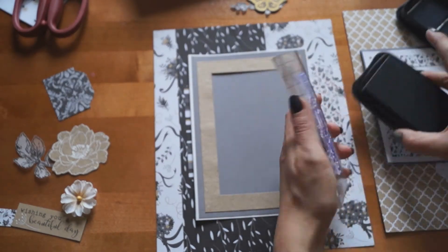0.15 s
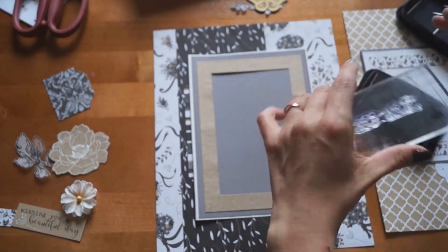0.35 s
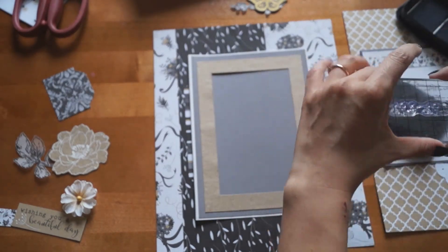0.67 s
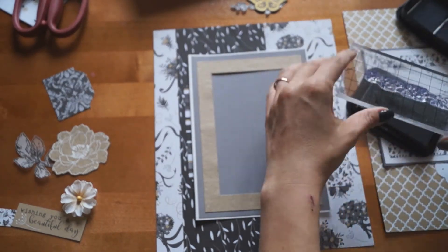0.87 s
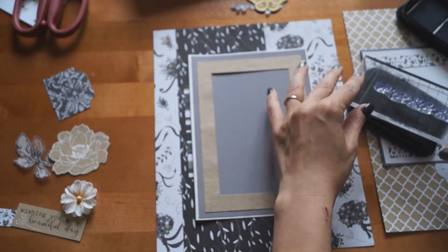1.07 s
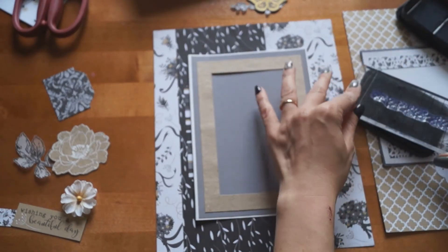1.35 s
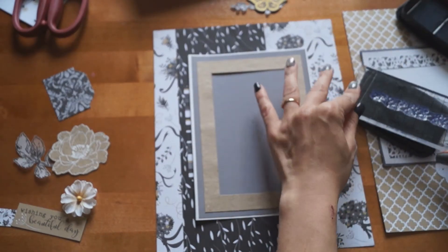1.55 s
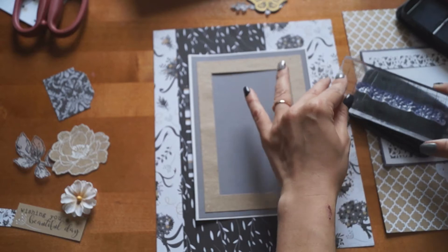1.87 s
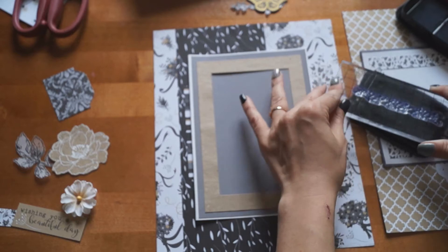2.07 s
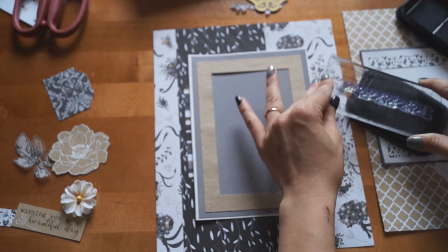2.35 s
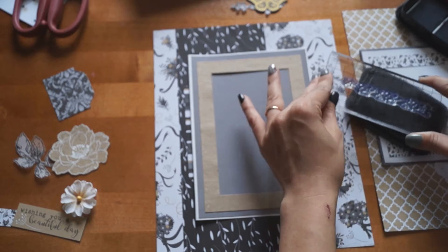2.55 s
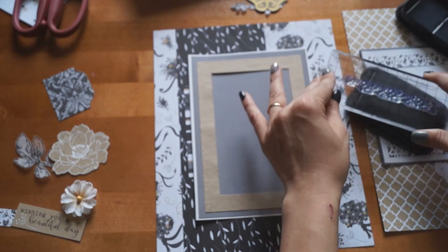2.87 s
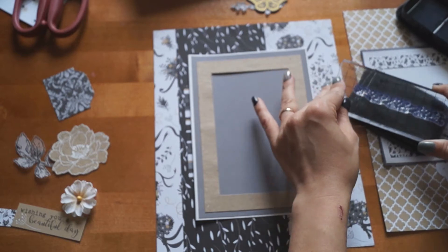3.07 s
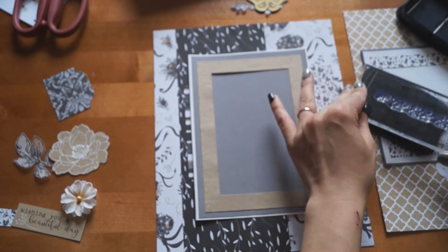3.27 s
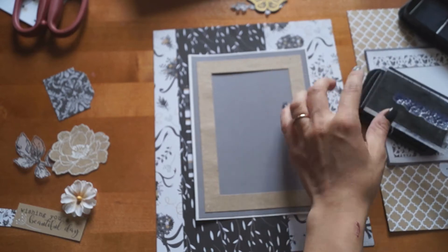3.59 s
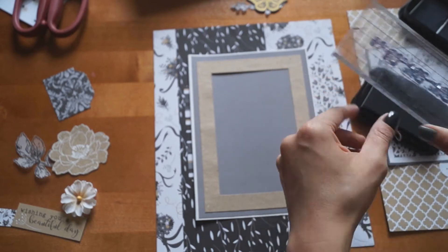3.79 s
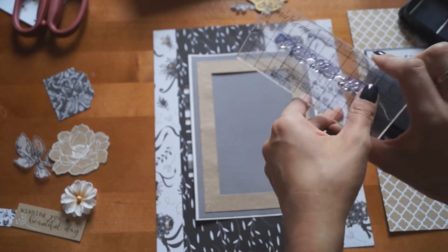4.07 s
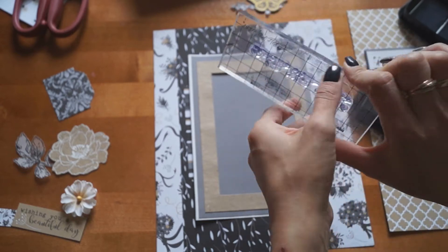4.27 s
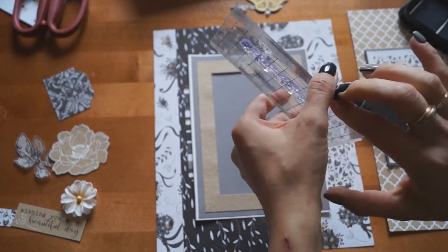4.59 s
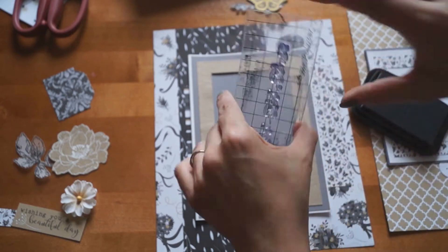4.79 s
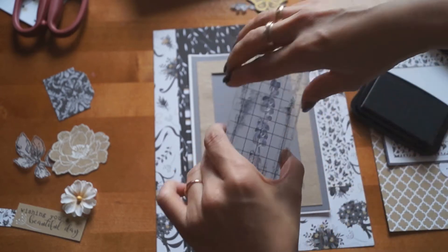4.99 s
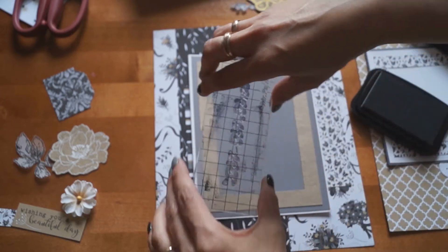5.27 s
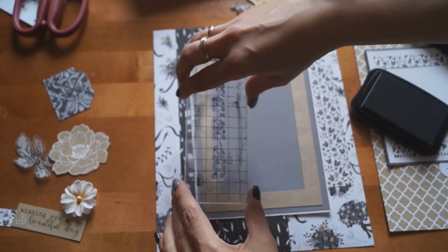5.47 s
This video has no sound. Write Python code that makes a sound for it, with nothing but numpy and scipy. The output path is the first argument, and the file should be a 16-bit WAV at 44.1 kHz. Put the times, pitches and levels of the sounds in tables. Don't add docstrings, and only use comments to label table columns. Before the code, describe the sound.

A plastic stamp block claps and taps on an ink pad in a small quiet room, irregular sharp clacks and soft pats, then near silence.

```python
import sys
import numpy as np
from scipy import signal
from scipy.fft import rfft, irfft
from scipy.io import wavfile
from scipy.ndimage import uniform_filter1d

SR = 44100
rng = np.random.default_rng(int(sys.argv[2]) if len(sys.argv) > 2 else 0)


def store_wav(level_fs):
    pcm = np.round(np.clip(np.atleast_2d(level_fs), -1, 1) * 32767)
    wavfile.write(sys.argv[1], SR, pcm.T.astype(np.int16))


def to_linear_factor(level_db):
    exponent = np.asarray(level_db, float) / 20
    return 10 ** exponent


N = 248724

# (frequency [Hz], level [dB per Hz])
AIR = [(20, -23), (100, -16), (340, -12), (800, -17.5), (2270, -23.5), (10600, -33.5), (11500, -42.5),
       (15000, -79)]
AIR_DB = -57
# (frequency [Hz], likeness [0-1])
AIR_SAME = [(60, 1), (140, 0.84), (350, 0.73), (830, 0.26), (2010, 0.36), (4820, 0.61), (11600, 0.67)]
# (time [s], level [dB])
SWELL = [(0, 3), (.25, 1), (.6, 3), (.9, 1), (1.2, -0.5), (3.9, -0.75), (4.6, -2), (5.64, -1.8)]
HISS_SHARE, MOAN_SHARE = 0.93, 2.5
# (frequency [Hz], level [dB rms])
WHINE = [(6347, -85), (7800, -94), (7827, -82.5), (8791, -86)]
MOAN_HZ, MOAN_WIDTH_HZ, MOAN_DB = 344.7, 37, -70.5
HUM_HZ, HUM_WIDTH_HZ, HUM_IDLE_DB, HUM_RUN_DB = 142.3, 39, -74.5, -63
HUM_START_S, HUM_RISE_S = 4.03, 0.35
RUB_DB, RUB_TOP_S, RUB_RISE_DB_PER_S, RUB_FALL_DB_PER_S2 = -59.5, 0.07, 40, 900

# (delay [ms], left level [dB], right level [dB])
ECHOES = [(2.7, -25, -5), (4.3, -11.5, -3.5), (6.3, -22.5, -12.5), (9.2, -12, -9), (10.3, -10, -16),
          (13.8, -4, -25), (17.5, -18, -18.5)]
# (frequency [Hz], t60 [s])
ROOM_T60 = [(100, 0.15), (260, 0.27), (700, 0.32), (1840, 0.32), (4850, .34), (10000, 0.24)]
ROOM_DB = -0.5
# (frequency [Hz], likeness [0-1])
ROOM_SAME = [(60, 0.97), (170, 0.79), (490, 0.9), (1410, 0.72), (4050, 0.54), (11600, 0.69)]
# (frequency [Hz], left minus right [dB])
SIDE_DB = [(60, 0), (170, -2), (490, -5.5), (1410, -0.5), (4050, 10), (11600, 2)]
MONO_BELOW_HZ, RUMBLE_CUT_HZ = 500, 42
LOW_CUT_HZ, EDGE_HZ = 162, 11150

# (frequency [Hz], level [dB], t60 [s])
TABLE = [(197.4, 11, 0.028), (248, -29.5, 0.014)]
# (frequency [Hz], level [dB], t60 [s])
LEGS = [(122, 0, .8), (85, -7, .5)]
# (frequency [Hz], level [dB], t60 [s])
CASE = [(391, -8, 0.098), (500, 8, 0.019), (717, 5.5, 0.018)]
# (frequency [Hz], level [dB], t60 [s])
KNOCK_RING = [(1290, -6, 0.013), (1774, 3.5, 0.02), (2095, -3, 0.044), (2515, -4, 0.024), (2675, -10, 0.032),
              (3100, -1, 0.0076), (3474, 4, 0.018), (3860, -10, 0.011), (4180, -2, 0.028), (4700, 3, 0.022),
              (5060, -3, 0.04), (5230, -2, .02), (6360, -4, .02)]
# (frequency [Hz], level [dB], t60 [s])
BLOCK_LOW = [(968, 0, 0.037)]
FILL_MS = 1.9
# (frequency [Hz], level [dB], t60 [s])
BLOCK_HELD = [(880, -19, 0.041), (957, 9, 0.016), (1190, 4.5, 0.013), (1554, 8.5, 0.022), (1590, -22, 0.1),
              (1890, 14.5, 0.0077), (2180, -8, 0.011), (3050, -90, 0.0055), (4000, 5, 0.0071)]
# (frequency [Hz], level [dB], t60 [s])
NAIL = [(9300, 1, 0.0019), (7840, -2, 0.0024), (5840, -11, 0.0016), (4100, -11, 0.0023),
        (2400, -19.5, .003), (1100, -21, .004)]
NAIL_S, NAIL_DB, NAIL_SLIP_MS, NAIL_SLIP_DB = 4.701, -27, 2, -28.5

# (time [s], level [dB])
THUDS = [
    (0.29, -41.5),
    (1.304, -56),
    (3.075, -47.5),
    (3.361, -37),
    (3.6, -48),
]
# (time [s], level [dB], length [ms], pitch [Hz])
TICKS = [(0.262, -42, 3, 2020), (0.2733, -20, 4.8, 2580), (0.2735, -30, 4, 6460), (0.288, -20.5, 2, 5600),
         (.348, -29, 1.8, 5700), (1.306, -45, 1.4, 3600), (1.984, -42.5, 2, 4440), (2.585, -51, 17, 9300),
         (3.076, -44, 4, 4700), (3.359, -25, 9.6, 5440), (3.597, -35, 2.9, 8300), (4.35, -53, 3, 5500),
         (4.951, -53, 3.6, 5030)]
# (time [s], level [dB], length [ms], pitch [Hz])
CHATTER = [
    (0.2756, -21, 2.2, 3360),
    (1.3045, -32, 4.3, 2090),
    (1.314, -40, 3, 2570),
    (3.36, -15.5, 12, 2600),
]
CHATTER_WIDTH = 0.88
# (time [s], level [dB], pitch [Hz])
HUMS = [(.289, -25.5, 460), (.33, -29.5, 463), (1.975, -33, 500), (1.984, -29, 526), (2.407, -39, 475),
        (2.407, -40, 365), (2.712, -52, 465), (3.075, -30, 481), (3.083, -35.5, 521), (3.083, -39, 455),
        (3.083, -39, 372), (.289, -28, 531), (3.36, -32.5, 492), (3.6, -25, 530.6)]
# (time [s], level [dB], pitch [Hz])
HIGH_RINGS = [
    (0.275, -27, 954),
    (0.288, -33, 965),
    (1.306, -41, 1580),
    (1.986, -27.5, 1768),
    (2.407, -36.5, 1776),
    (3.6, -35, 1190),
    (3.6, -34.5, 1487),
]
HUM_T60_S, HIGH_RING_T60_S = 0.14, 0.13
# (time [s], level [dB], contact [ms])
RATTLES = [
    (0.2753, -20.5, 0.036),
    (0.3474, -19, 0.074),
]
RATTLE_CASE_DB, RATTLE_BLOCK_DB = -5.5, -10
# (time [s], push [dB], held block [dB], contact [ms])
TOUCHES = [
    (1.9755, -48, -28, 0.038),
    (2.3964, -40, -58, 0.15),
    (2.7029, -32, -41, 0.27),
    (3.0755, -29.5, -26, 0.093),
    (3.5991, -22, -21.5, 0.081),
]
# (time [s], push into table [dB], air snap [dB], held block [dB], contact [ms])
BLOWS = [
    (0.2737, -20, -16, -14, 0.03),
    (0.2885, -22, -6.5, -9, 0.075),
    (1.9841, -23, -17, -22.5, 0.097),
    (2.407, -26, -23, -30.5, 0.12),
    (2.713, -27, -27.5, -42, 0.15),
    (3.0831, -29.5, -27.5, -32.5, 0.089),
    (3.601, -19, -19.5, -23, 0.11),
]
PAD_CASE_DB, TOUCH_CASE_DB = 3, 2
FELT_DB_PER_MS = -79
# (time [s], blow [dB], free ring [dB], contact [ms], looseness of grip [0-1])
KNOCKS = [
    (1.3041, -27.5, -18, 0.027, 0.25),
    (3.3592, -15, -1.5, 0.012, 0.73),
]
KNOCK_TABLE_DB, KNOCK_CASE_DB = -9, -5
SILENT_DB = -90


def evened(x):
    return x / np.sqrt(np.mean(x ** 2) + 1e-20)


def peaked(x):
    return x / (abs(x).max() + 1e-20)


def read(points, hz):
    f, value = np.transpose(points)
    return np.interp(np.log(hz + 1), np.log(f + 1), value)


def add(mix, s, sound):
    part = mix[round(s * SR):][:len(sound)]
    part += sound[:len(part)]


def narrow(x, hz, width):
    r = np.exp(-np.pi * width / SR)
    return signal.lfilter([1, 0, -1], [1, -2 * r * np.cos(2 * np.pi * hz / SR), r * r], x)


def paired(a, b, same):
    same = np.clip(same, 0, 1)[:, None]
    shared = np.sqrt((1 + same) / 2) * a
    apart = np.sqrt((1 - same) / 2) * b
    return np.array([shared + apart, shared - apart])


def stir(t):
    return np.interp(t, *np.transpose(SWELL))


def air():
    frames, hz = N // 256 + 5, np.fft.rfftfreq(1024, 1 / SR)
    a, b, c, d, patches = rng.standard_normal((frames, 513, 5)).T
    patches = evened(uniform_filter1d(uniform_filter1d(patches, 10, 0), 12, 1))
    z = paired(a + 1j * b, c + 1j * d, read(AIR_SAME, hz))
    z = z * to_linear_factor(read(AIR, hz)[:, None] + 1.52 * patches)
    level = to_linear_factor(AIR_DB) / np.std(signal.istft(z, nperseg=1024, noverlap=768)[1])
    low_db = stir(np.arange(frames) * 256 / SR)
    high_db = HISS_SHARE * low_db
    z = z * to_linear_factor(high_db + (low_db - high_db) / (1 + (hz[:, None] / 2500) ** 2))
    return level * signal.istft(z, nperseg=1024, noverlap=768)[1][:, :N]


def humming(hz, width, db):
    noise = narrow(rng.standard_normal(N), hz, width)
    return to_linear_factor(db) * evened(narrow(noise, hz, width))


def appliance(t):
    run = np.clip((t - HUM_START_S) / HUM_RISE_S, 0, 1)
    hum = humming(HUM_HZ, HUM_WIDTH_HZ, HUM_IDLE_DB + (HUM_RUN_DB - HUM_IDLE_DB) * run)
    return hum + humming(MOAN_HZ, MOAN_WIDTH_HZ, MOAN_DB + MOAN_SHARE * stir(t))


def whine():
    return sum(to_linear_factor(db) * evened(narrow(rng.standard_normal(N), hz, 16)) for hz, db in WHINE)


def skin_rub(t):
    slide = narrow(rng.standard_normal(N), 5140, 600) + 0.22 * narrow(rng.standard_normal(N), 6300, 300)
    late = t - RUB_TOP_S
    rub_db = RUB_DB + np.where(late < 0, RUB_RISE_DB_PER_S * late, -RUB_FALL_DB_PER_S2 * late ** 2)
    return to_linear_factor(np.maximum(rub_db, -200)) * evened(slide)


def room(x):
    taps = np.zeros((2, SR // 2))
    at = np.arange(340, SR // 2 - 20, 20)
    at = at + rng.integers(0, 20, (2, len(at)))
    np.put_along_axis(taps, at, rng.choice([-1., 1.], at.shape), 1)
    hz, t, z = signal.stft(taps, SR, nperseg=256)
    z = paired(*z, read(ROOM_SAME, hz)) * to_linear_factor(-60 * t / read(ROOM_T60, hz)[:, None])
    tail = signal.istft(z, SR, nperseg=256)[1]
    tail *= 1 - np.exp(-np.arange(tail.shape[1]) / (0.0017 * SR))
    tail *= to_linear_factor(ROOM_DB) / np.linalg.norm(tail[0])
    for k, (ms, left_db, right_db) in enumerate(ECHOES):
        lag_ms = 0.19 * (-1) ** k
        tail[0, round(ms * SR / 1000)] += to_linear_factor(left_db)
        tail[1, round((ms + lag_ms) * SR / 1000)] += to_linear_factor(right_db)
    return signal.fftconvolve(x[None], tail, axes=1)[:, :N]


def push(contact_ms):
    u = np.arange(512) / (SR * contact_ms / 1000)
    return u ** 4 * np.exp(-u)


def ring(modes, force, flip=1):
    t = np.arange(SR // 2) / SR
    body = np.zeros(len(t))
    for k, (hz, db, t60) in enumerate(modes):
        sense = flip ** (k * (k + 1) // 2)
        body += sense * to_linear_factor(db - 60 * t / t60) * np.sin(2 * np.pi * hz * t)
    return peaked(signal.fftconvolve(body, force)[:len(t)])


def thud(s, db):
    return s, to_linear_factor(db) * ring(LEGS, push(3.55))


def tick(s, db, ms, hz):
    t = np.arange(2048) / SR
    burst = rng.standard_normal(len(t)) * np.exp(-t / (ms / 2000))
    return s, to_linear_factor(db) * peaked(narrow(burst, hz, 0.33 * hz))


def chatter(s, db, ms, hz):
    scrape = tick(s, db, ms, hz)[1]
    return s, to_linear_factor(db) * peaked(narrow(scrape, hz, CHATTER_WIDTH * hz))


def nail_click(hits):
    add(hits, NAIL_S, to_linear_factor(NAIL_DB) * ring(NAIL, push(0.0045), flip=-1.04))
    add(hits, *tick(NAIL_S + NAIL_SLIP_MS / 1000, NAIL_SLIP_DB, 2.4, NAIL[1][0]))


def one_note(s, db, hz, t60):
    return s, to_linear_factor(db - 2.0) * ring([(hz, 0, t60)], push(0.12))


def case_hum(s, db, hz):
    return one_note(s, db, hz, HUM_T60_S)


def high_ring(s, db, hz):
    return one_note(s, db, hz, HIGH_RING_T60_S)


def pat(s, snap_db, table_db, case_db, block_db, contact_ms):
    force = push(contact_ms)
    out = to_linear_factor(table_db) * ring(TABLE, force)
    out += to_linear_factor(case_db) * ring(CASE, force)
    out += to_linear_factor(block_db) * ring(BLOCK_HELD, force)
    add(out, 0, -to_linear_factor(snap_db) * peaked(np.gradient(force)))
    return s, out


def rattle(s, db, contact_ms):
    return pat(s, db, SILENT_DB, db + RATTLE_CASE_DB, db + RATTLE_BLOCK_DB, contact_ms)


def touch(s, push_db, block_db, contact_ms):
    case_db = push_db + TOUCH_CASE_DB + FELT_DB_PER_MS * contact_ms
    return pat(s, SILENT_DB, push_db, case_db, block_db, contact_ms)


def blow(s, push_db, snap_db, block_db, contact_ms):
    case_db = push_db + PAD_CASE_DB + FELT_DB_PER_MS * contact_ms
    return pat(s, snap_db, push_db, case_db, block_db, contact_ms)


def knock(s, low_db, upper_db, contact_ms, loose):
    force = push(contact_ms)
    out = to_linear_factor(low_db + KNOCK_TABLE_DB) * ring(TABLE, force)
    out += to_linear_factor(low_db + KNOCK_CASE_DB) * ring(CASE, force)
    t = np.arange(len(out)) / SR
    out += to_linear_factor(low_db) * (1 - np.exp(-t / (FILL_MS / 1000))) * ring(BLOCK_LOW, force)
    spreading = 1 - 0.7 * np.exp(-t / 0.0018)
    gripped = [(hz, db, loose * t60) for hz, db, t60 in KNOCK_RING]
    return s, -out - to_linear_factor(upper_db) * spreading * ring(gripped, force, flip=-0.967)


def high_pass(x, order, hz):
    return signal.sosfilt(signal.butter(order, hz, "high", fs=SR, output="sos"), x)


def at_microphones(hits):
    lean = to_linear_factor(read(SIDE_DB, np.fft.rfftfreq(N, 1 / SR)) / 2)
    direct = irfft(rfft(hits) * np.array([lean, 1 / lean]), N)
    taps = direct + room(hits)
    bass_side = signal.lfilter(*signal.butter(1, MONO_BELOW_HZ, fs=SR), taps[0] - taps[1]) / 2
    return taps - bass_side * np.array([[1], [-1]])


def scene():
    t = np.arange(N) / SR
    background = air() + appliance(t) + whine() + skin_rub(t)
    hits, thuds = np.zeros(N), np.zeros(N)
    for row in THUDS:
        add(thuds, *thud(*row))
    sources = ((tick, TICKS), (chatter, CHATTER), (case_hum, HUMS), (high_ring, HIGH_RINGS),
               (rattle, RATTLES), (touch, TOUCHES), (blow, BLOWS), (knock, KNOCKS))
    for source, rows in sources:
        for row in rows:
            add(hits, *source(*row))
    nail_click(hits)
    taps = at_microphones(high_pass(hits, 3, LOW_CUT_HZ))
    return taps + high_pass(thuds, 2, RUMBLE_CUT_HZ) + background


def low_pass(x):
    return signal.sosfilt(signal.butter(12, 12200, fs=SR, output="sos"), x)


def record(dry):
    edge = signal.firwin(241, EDGE_HZ, window=("kaiser", 9), fs=SR)
    mix = signal.oaconvolve(dry, edge[None], "same")
    return low_pass(mix)


dry = scene()
out = record(dry)
store_wav(out)
```